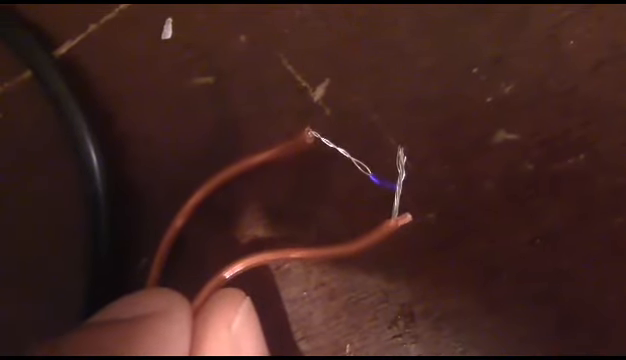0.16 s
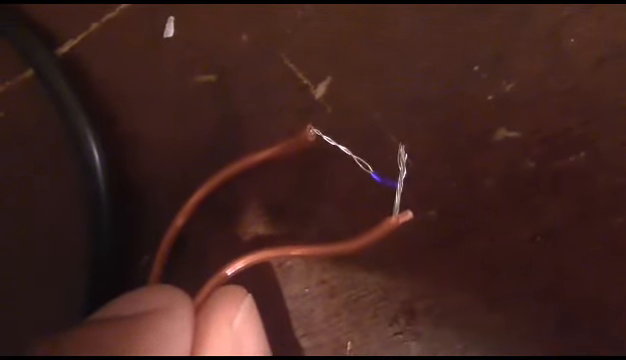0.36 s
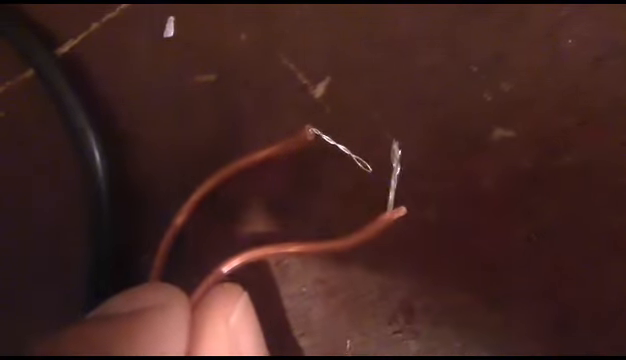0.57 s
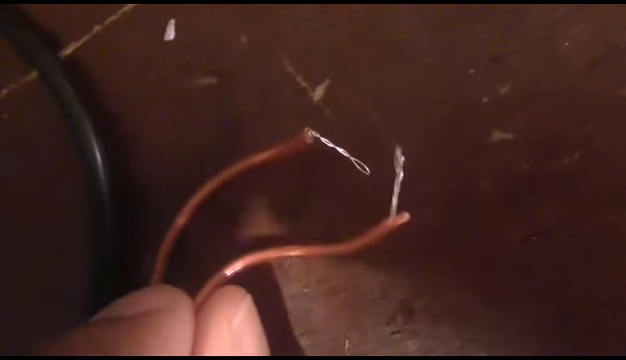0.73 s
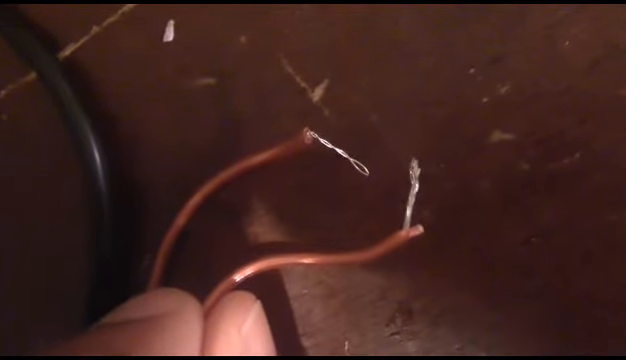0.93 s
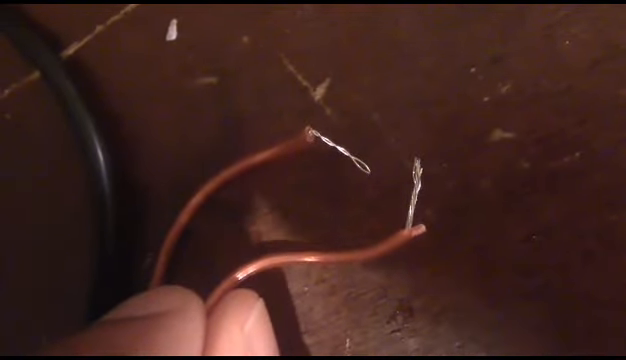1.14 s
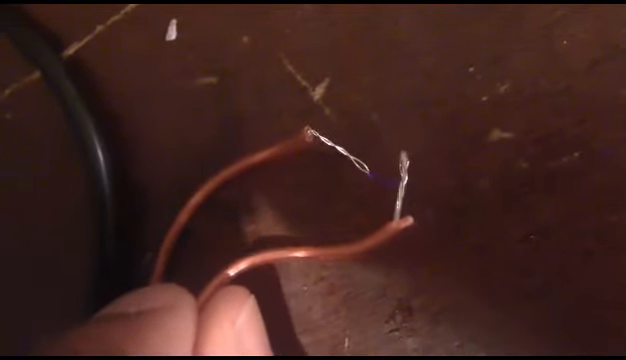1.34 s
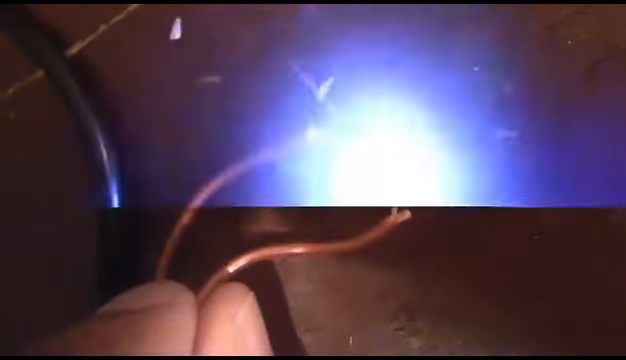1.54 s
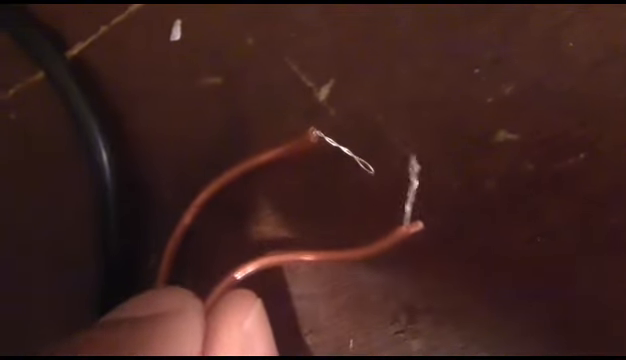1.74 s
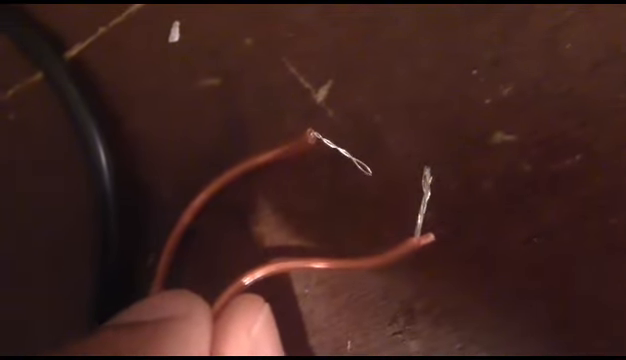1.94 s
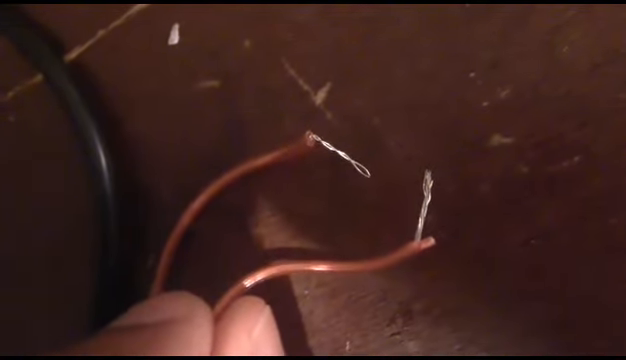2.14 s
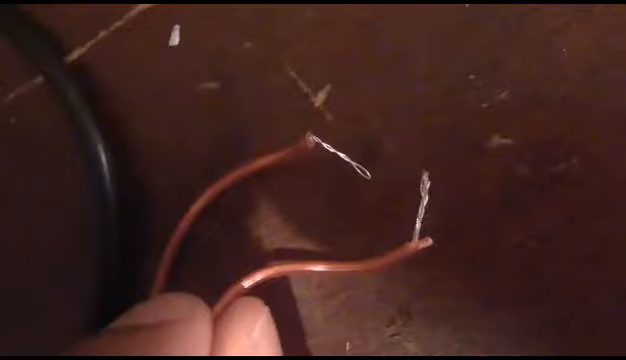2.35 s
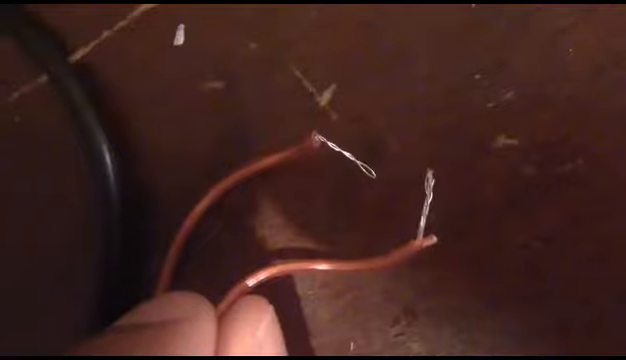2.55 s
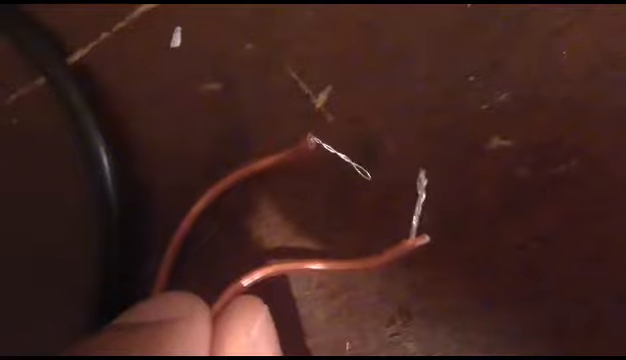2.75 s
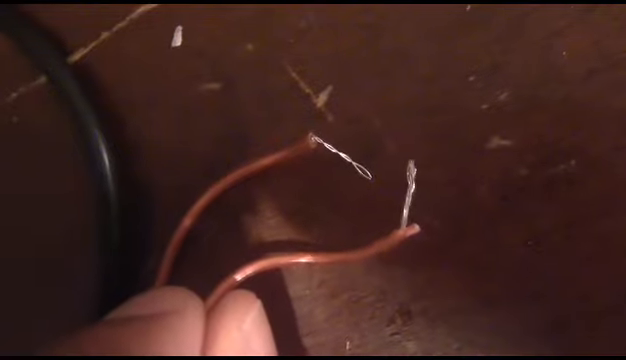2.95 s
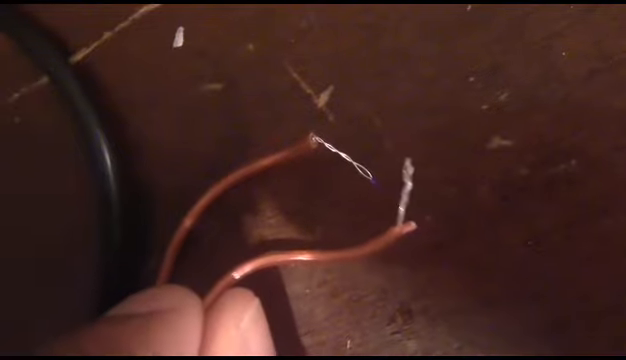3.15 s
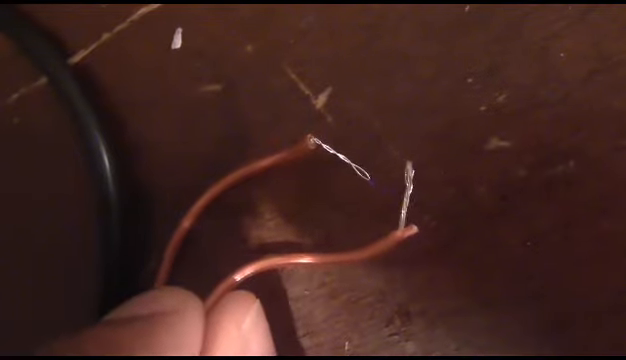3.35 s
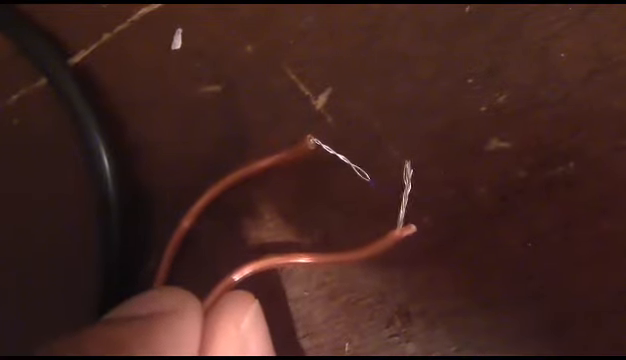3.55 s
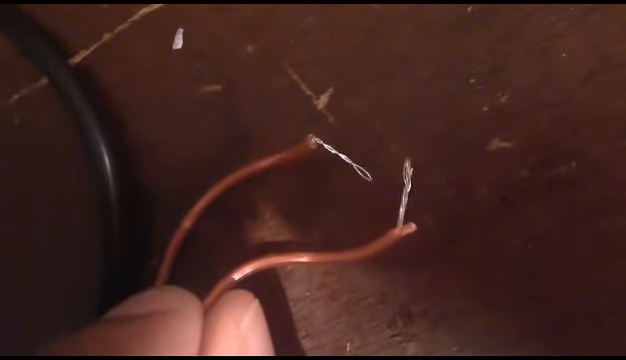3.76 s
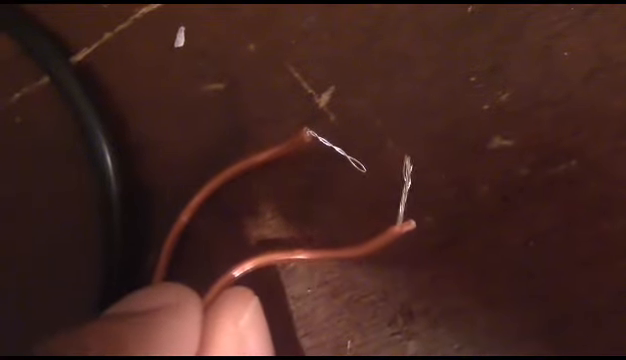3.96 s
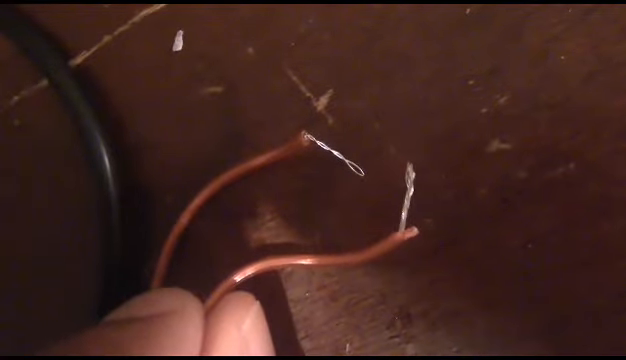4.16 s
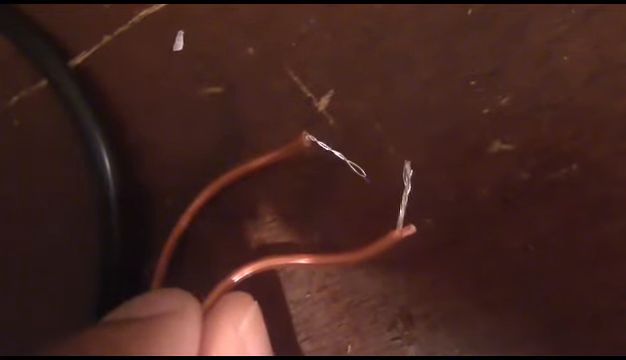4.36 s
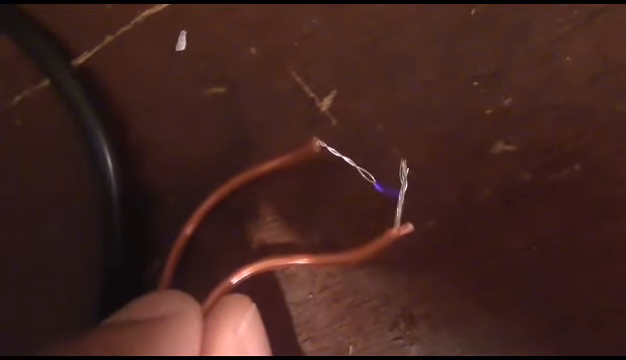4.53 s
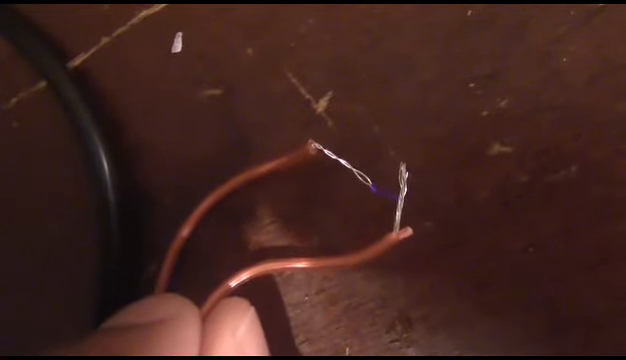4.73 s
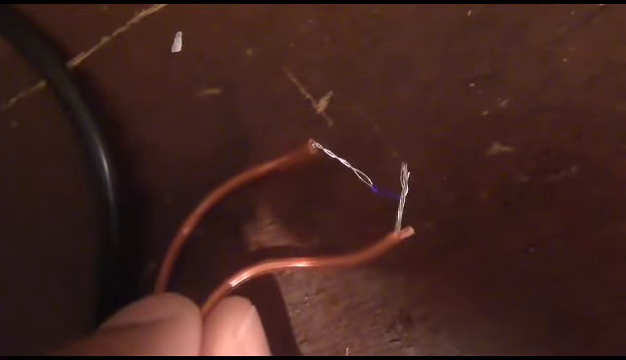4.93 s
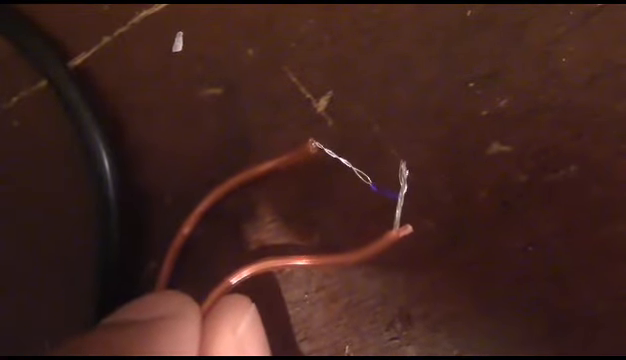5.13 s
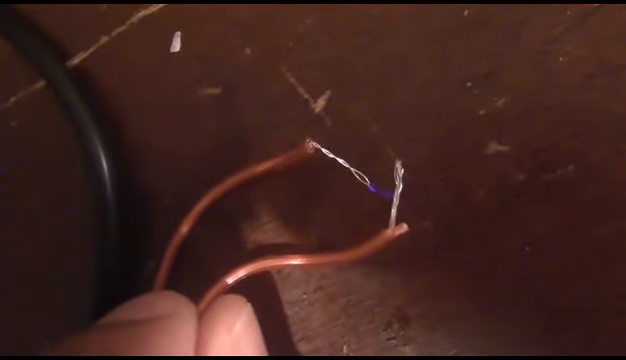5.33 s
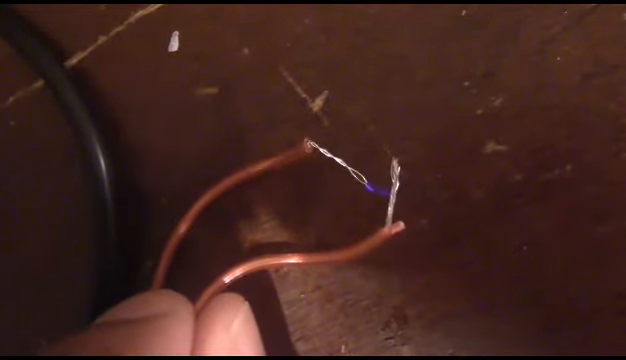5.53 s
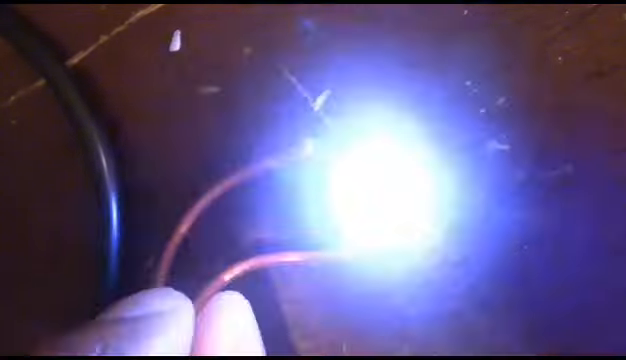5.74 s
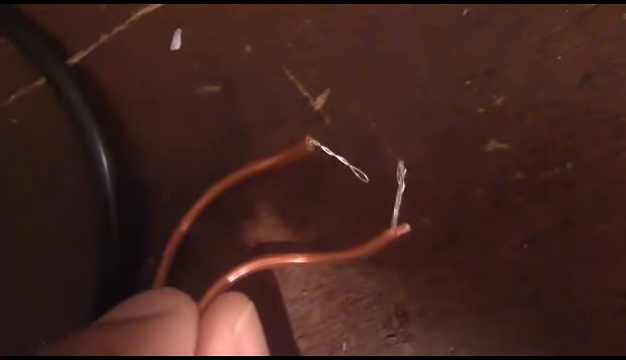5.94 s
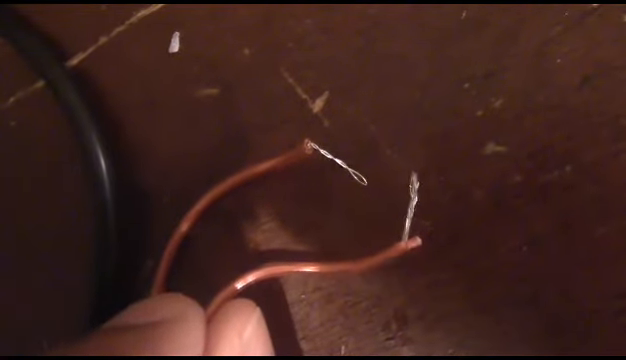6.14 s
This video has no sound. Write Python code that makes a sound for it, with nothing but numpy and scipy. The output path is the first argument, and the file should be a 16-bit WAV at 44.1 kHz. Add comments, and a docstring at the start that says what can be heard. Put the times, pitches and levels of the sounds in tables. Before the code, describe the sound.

A thin electric arc sizzles brightly between two wire ends, close to the microphone, with the very high whine of a small high-voltage generator. A light knock comes at 0.4 seconds. At 0.7 a loud spark snaps, overloading the microphone and ringing briefly in the room; the sizzle stops and the whine drops to a faint trace. The arc spits, sizzles again from 1.5, and ends in a second snap at 1.7. Faint ticking sputter starts around 2.2 and grows into short, uneven spurts between 3 and 4 seconds. Two soft rustles pass at about 2.4 and 4.4. From 4.6 the arc sizzles steadily and the whine slowly swells, until a third sharp snap cuts the arc off at 5.9. Faint hiss and low room noise continue throughout.

```python
"""A small high-voltage generator sparks between two wire ends held over a desk, whining near 10 kHz.
With the gap narrow a thin arc sizzles; with it wider the arc only spits in short spurts.
Three times a fat spark snaps, overloads the microphone and rings through the room.
Indoors, one close microphone: a light knock and two rustles nearby, faint murmur and hiss behind."""
import sys
import numpy as np
from scipy import signal
from scipy.fft import rfft, irfft
from scipy.io import wavfile

SR = 44100
rng = np.random.default_rng(int(sys.argv[2]) if len(sys.argv) > 2 else 0)


def master_out(mix):
    """Clip the mix to full scale and print it as 16-bit PCM to the path in sys.argv[1]."""
    frames = np.transpose(np.atleast_2d(mix))
    ceiling = np.clip(frames, -1, 1)
    pcm = np.round(ceiling * 32767).astype(np.int16)
    wavfile.write(sys.argv[1], SR, pcm)


N = 272979
TIME = np.arange(N) / SR


def from_db(db):
    """Decibels to gain."""
    return 10 ** (np.asarray(db) / 20)


def rms_one(x):
    """Scale to rms 1."""
    return x / np.sqrt(np.mean(x ** 2) + 1e-20)


def dying(t, t60):
    """Gain that falls 60 dB in t60 seconds."""
    return np.exp(-np.log(1000) * t / t60)


def in_time(rows):
    """Each column of a curve at every sample."""
    times, *columns = np.transpose(rows)
    return [np.interp(TIME, times, column) for column in columns]


def add(out, start_s, sound):
    """Mix a sound in at start_s."""
    at = max(round(start_s * SR), 0)
    out[at:at + len(sound)] += sound[:N - at]


def cut(x, hz, kind, order=2):
    """Butterworth filter."""
    return signal.sosfilt(signal.butter(order, hz, kind, fs=SR, output="sos"), x + 1e-18)


def colour(x, spectrum, size=4096):
    """Causal (minimum-phase) filter with the given spectral shape and unit energy."""
    hz, db = np.transpose(spectrum)
    grid = np.maximum(np.fft.rfftfreq(size, 1 / SR), 1)
    gain = from_db(np.interp(np.log(grid), np.log(hz), db))
    gain *= np.minimum(grid / hz[0], 1) * np.minimum(hz[-1] / grid, 1) ** 2   # roll off past both ends
    cepstrum = irfft(np.log(gain))[:size // 2]
    cepstrum[1:] *= 2
    pulse = irfft(np.exp(rfft(cepstrum, size)))
    return signal.oaconvolve(x, pulse / np.linalg.norm(pulse))[:len(x)]


def noise(spectrum, count=N):
    """Coloured noise of rms about 1."""
    return colour(rng.standard_normal(count), spectrum)


def drift(hz):
    """Random wander below hz, of rms 1."""
    return rms_one(cut(rng.standard_normal(N + SR), hz, "low")[SR:])


# the transformer's whine at the microphone: t/s, level/dB
WHINE_LEVELS = [(0, -47.5), (.7, -46), (.76, -64.5), (1.65, -67), (1.95, -72), (2.4, -67), (4.6, -66.5),
                (5.9, -55.5), (6.0, -65.5)]
def oscillator(arc_gain, idle_hz=9823, rise_hz=105, full_load_db=-44, recovery_s=.45,
               wander_hz=18, flutter_hz=45):
    """Phase in cycles and transformer whine; the pitch rises under the arc's load and sinks back slowly."""
    load = np.minimum(arc_gain / from_db(full_load_db), 1)
    fading = np.exp(-TIME / recovery_s)
    held_load = np.maximum.accumulate(load / fading) * fading
    hz = idle_hz + rise_hz * held_load + wander_hz * drift(25) + flutter_hz * drift(400)
    cycles = np.cumsum(hz) / SR
    whine = from_db(in_time(WHINE_LEVELS)[0]) * np.sqrt(2) * np.sin(2 * np.pi * cycles)
    return cycles, whine


def discharges(cycles, firing_share, clumping=.55, clump_hz=900):
    """At most one tiny spark a cycle; warm air helps the next, so they come in runs. Mean power 1."""
    at = np.flatnonzero(np.diff(np.floor(cycles)))
    ease = clumping * drift(clump_hz)[at] + .12 * drift(90)[at] + .5 * rng.standard_normal(len(at))
    rank = np.argsort(np.argsort(ease)) / len(at)
    fires = rank < firing_share[at]
    polarity = rng.choice([-1, 1], len(at))
    clicks = np.zeros(N)
    clicks[at] = fires * polarity * np.sqrt(N / len(at) / firing_share[at])
    return clicks


# spectrum of one tiny spark, close up: f/Hz, relative level/dB
SPARK_SPECTRUM = [(100, -35), (500, -16.5), (1800, -12), (2700, -8), (3950, -5), (5100, -9.5), (5950, -6),
                  (6500, -11), (7300, -6), (7900, -8.5), (9500, 2.5), (11800, 0.5), (14100, -6.5),
                  (15000, -19.5)]
def sizzle(clicks, treble_gain, body_gain, split_hz=7000):
    """Sparks heard as a bright edge and a duller body."""
    treble = cut(colour(clicks * treble_gain, SPARK_SPECTRUM), split_hz, "high", order=4)
    body = cut(colour(clicks * body_gain, SPARK_SPECTRUM), split_hz, "low", order=4)
    return treble + body


# the arc in the narrow gap, close up, one curve per burn: t/s, treble level/dB
ARC_BURNS = [
    [(0.0, -41), (0.028, -40), (0.654, -40), (0.7, -37)],
    [(1.495, -54), (1.531, -43), (1.601, -45), (1.623, -39), (1.695, -45), (1.735, -39)],
    [(4.637, -45), (4.643, -39.5), (4.799, -45), (5.287, -44.5), (5.365, -42), (5.663, -44), (5.671, -41.5),
     (5.91, -41)],
]
def arc_burns():
    """Gain of the steady arc: each burn lasts until a snap drains the charge."""
    gain = np.zeros(N)
    for burn, snap in zip(ARC_BURNS, FAT_SPARKS):
        burning = (TIME >= burn[0][0]) & (TIME < snap[0])
        gain += burning * from_db(in_time(burn)[0])
    return gain


FULL_ARC_DB = -37.5
def steady_arc(cycles, arc_gain, body_db=-.25, dulling=.83, weak_db=-46):
    """A louder arc fires on more of the cycles; a weak arc is duller."""
    body = arc_gain * np.maximum(from_db(weak_db) / (arc_gain + 1e-9), 1) ** dulling
    firing_share = np.clip((arc_gain / from_db(FULL_ARC_DB)) ** 2, .1, .7)
    return sizzle(discharges(cycles, firing_share), arc_gain, body * from_db(body_db))


# spectrum of the room's wash, heard from the desk: f/Hz, relative level/dB
WASH_SPECTRUM = [(150, -32), (500, -15.5), (1200, -4), (2200, -5.5), (3600, -1.5), (4600, -4.5),
                 (6000, 1.5), (7500, -0.5), (9400, 3), (10900, -4.5), (12000, 0), (15500, -10)]
def room_tail(t60=.27, build_s=.055, early_db=-4, dull_hz=7000, treble_t60=.079,
              late_db=-17, late_t60=.47):
    """Diffuse reflections build up while they cross the room, then die, the treble sooner."""
    t = TIME[:SR // 2]
    wash = noise(WASH_SPECTRUM, len(t))
    low = cut(wash, dull_hz, "low", order=1)
    swell = np.clip(t / .0053, 0, 1) ** 2 * from_db(early_db * np.maximum(1 - t / build_s, 0))
    decay_s = np.maximum(t - build_s, 0)
    lingering = wash * from_db(late_db) * dying(decay_s, late_t60)
    return swell * (low * dying(decay_s, t60) + (wash - low) * dying(decay_s, treble_t60) + lingering)


# murmur and hiss behind the generator: t/s, relative level/dB
MURMUR_LEVELS = [(0, -62.5), (.65, -59.5), (1.3, -62.5), (1.5, -70.5), (2.03, -79.5), (2.35, -73.5),
                 (5.2, -68), (6.1, -65.5)]
HISS_LEVELS = [(1.25, -69), (2.08, -76), (2.3, -70.5), (4.2, -68)]
# their spectra: f/Hz, relative level/dB
MURMUR_SPECTRUM = [(25, -27.5), (70, -17), (140, -12), (300, -1.5), (450, -4.5), (800, -8), (1500, -11.5),
                   (3000, -30)]
HISS_SPECTRUM = [(400, -14), (1200, -2), (2500, 0), (4500, -1), (5800, -3), (6600, -4.5), (8400, -3),
                 (9700, -3), (10800, -9), (13000, -13), (15500, -20)]
def room_tone(murmur_trim_db=.5):
    """Low room murmur and faint hiss, both slowly sinking and swelling."""
    murmur = from_db(in_time(MURMUR_LEVELS)[0] + murmur_trim_db) * noise(MURMUR_SPECTRUM)
    hiss = from_db(in_time(HISS_LEVELS)[0]) * noise(HISS_SPECTRUM)
    return murmur + hiss


# modes of a knock near the microphone: f/Hz, relative level/dB, t60/s
KNOCK_MODES = [(423, -28.5, 0.025), (1330, -23, 0.0123), (1610, -19, .011), (2135, -32, 0.0071),
               (3360, -31, .005)]
def knock(start_s=.4129, contact_s=.00016, low_cut_hz=300):
    """One light contact sets a few short-lived modes ringing."""
    out, t = np.zeros(N), TIME[:SR // 10]
    ring = sum(from_db(db) * dying(t, t60) * np.sin(2 * np.pi * hz * t) for hz, db, t60 in KNOCK_MODES)
    attack = 1 - np.exp(-t / contact_s)
    add(out, start_s, cut(ring * attack, low_cut_hz, "high"))
    return out


# fat sparks at close range, levels ahead of the overload: t/s, crack length/s, crack level/dB,
# pulse level/dB, pulse length/s, microphone swing f/Hz, room level/dB
FAT_SPARKS = [(0.7163, 0.002, -12.5, 1.5, .002, 85.1, -27.5),
              (1.7474, 0.0026, -5.5, -9.5, 0.0018, 151, -32.5),
              (5.9284, 0.0008, -2.5, 3.5, 0.002, 105, -29)]
# spectrum of the crack: f/Hz, relative level/dB
CRACK_SPECTRUM = [(200, -21.5), (1000, -19.5), (1800, -8.5), (4000, -1), (6200, -2), (9000, 1.5),
                  (12500, -1.5), (15500, -15)]
# first reflections from the walls to the microphone: delay t/s, level/dB
WALL_ECHOES = [(.0070, -13.5), (.0081, -6), (0.013, -6), (0.0179, -12), (0.031, -13), (.0545, -8),
               (.061, -17)]
def snaps(fade_s=.0004, desk_db=-24, desk_s=.004, dip_s=.001, dip_db=-11, leak_hz=40,
          scatter_db=-16, scatter_s=.0007):
    """A crack, a slow pressure pulse that makes the microphone swing, wall echoes and the room's wash."""
    out, t = np.zeros(N), TIME[:SR // 20]
    for start_s, length_s, crack_db, pulse_db, pulse_s, swing_hz, room_db in FAT_SPARKS:
        # the crack dies at once, but scatters a little longer off the desk
        direct = np.exp(-np.maximum(t - length_s, 0) / fade_s)
        off_desk = from_db(desk_db) * np.exp(-t / desk_s)
        add(out, start_s, from_db(crack_db) * (direct + off_desk) * noise(CRACK_SPECTRUM, len(t)))
        # a short dip, then the push; the microphone cannot hold a pressure, so it swings back
        dip = from_db(dip_db) * np.sin(np.pi * np.minimum(t / dip_s, 1))
        push = np.sin(np.pi * np.clip((t - dip_s) / pulse_s, 0, 1))
        swing = cut(push - dip, swing_hz, "high")
        add(out, start_s, from_db(pulse_db) * cut(swing, leak_hz, "high", order=1))
        # each wall returns one sharp spike and a little scatter
        spike = t == 0
        for delay_s, echo_db in WALL_ECHOES:
            scatter = from_db(scatter_db) * rng.standard_normal(len(t)) * np.exp(-t / scatter_s)
            add(out, start_s + delay_s, from_db(echo_db) * colour(spike + scatter, CRACK_SPECTRUM))
        add(out, start_s, from_db(room_db) * room_tail())
    return out


def afterglow(fuller_db=7, fade_s=.39):
    """Gain on the body of the spurts: they sound fuller for a moment after a snap."""
    since = np.maximum(TIME[:, None] - [snap[0] for snap in FAT_SPARKS], 0)
    return from_db(fuller_db * np.max((since > 0) * np.exp(-since / fade_s), axis=1))


# sputter in the wide gap, close up, one curve per bout: t/s, spit rate/Hz, relative treble level/dB
SPUTTER_BOUTS = [
    [(.88, 114, -34), (.98, 40, -47), (1.08, 48.3, -45.5), (1.2, 49, -50), (1.26, 250, -51.5),
     (1.36, 230, -56), (1.5, 266, -50.5)],
    [(2.2, 35.6, -58.5), (2.6, 35.4, -54), (3.05, 31, -49.5), (3.33, 25, -46.5), (3.37, 140, -30),
     (3.51, 130, -38), (3.57, 30, -46.5), (3.63, 190, -41.5), (3.73, 48, -41), (3.92, 192, -38),
     (3.99, 78, -45.5), (4.04, 110, -52.5), (4.15, 55, -52.5), (4.63, 35, -48.5)],
]
def spits(typical_s=.0008, length_spread=.34, wait_spread=.4, spread_db=2, count=400):
    """Charge builds up and leaps the gap after an uneven wait; yields t/s, length/s, level/dB."""
    for bout in SPUTTER_BOUTS:
        rate_hz, db = in_time(bout)
        active = (TIME >= bout[0][0]) & (TIME < bout[-1][0])
        charge = np.cumsum(rate_hz * active) / SR
        wait_draw, length_draw, level_draw = rng.standard_normal((count, 3)).T
        waits = np.exp(wait_spread * wait_draw)
        lengths = typical_s * np.exp(length_spread * length_draw)
        leaps = np.searchsorted(charge, np.cumsum(waits / waits.mean()))
        for at, length_s, offset_db in zip(leaps, lengths, spread_db * level_draw):
            if at < N:
                yield TIME[at], length_s, db[at] + offset_db


# the strongest spurts in the wide gap, close up: t/s, length/s, relative treble level/dB
STRONG_SPURTS = [(0.9252, .002, -38), (0.943, .0012, -40), (0.9654, .003, -41.5), (1.011, .0023, -42.5),
                 (2.7143, .0067, -53), (2.8293, .0055, -52.5), (3.0977, 0.0027, -42), (3.13, .002, -45),
                 (3.1575, .002, -49.5), (3.182, .003, -45), (3.313, .0016, -45), (3.346, .007, -38.5),
                 (3.364, .014, -39.5), (3.397, .014, -41.5), (3.4393, .008, -39), (3.452, .017, -40),
                 (3.584, .0012, -48), (3.6077, .0017, -42), (3.66, .011, -45.5), (3.716, .0048, -42.5),
                 (3.8134, .0032, -39.5), (3.843, .06, -39), (3.998, .031, -37), (4.448, .0034, -51),
                 (4.5615, .002, -47)]
def spurts(cycles, charging_s=.011, treble_db=-2.7, body_db=-6.5, dulling=.52,
           strike_treble_db=7, strike_body_db=15):
    """Short dense runs of sparks, each opened by one hard strike; the weak ones are duller."""
    treble, body, strikes = np.zeros((3, N))
    # the sputter pauses while a strong spurt charges up and burns
    pauses = [(start_s - charging_s, start_s + length_s) for start_s, length_s, _ in STRONG_SPURTS]
    sputter = [spit for spit in spits() if not any(begin < spit[0] < end for begin, end in pauses)]
    for start_s, length_s, db in list(STRONG_SPURTS) + sputter:
        run = slice(round(start_s * SR), round((start_s + length_s) * SR))
        treble[run] = from_db(db + treble_db)
        body[run] = from_db(db + body_db + dulling * (FULL_ARC_DB - db))
        strikes[run.start] = 1
    body *= afterglow()
    clicks = discharges(cycles, firing_share=np.full(N, .6), clumping=.2)
    openings = sizzle(strikes, treble * from_db(strike_treble_db), body * from_db(strike_body_db))
    return openings + sizzle(clicks, treble, body)


# rustles near the microphone: centre t/s, half-width/s, level/dB
RUSTLE_SWELLS = [(2.362, 0.017, -63), (4.37, 0.025, -65.5)]
# their spectrum: f/Hz, relative level/dB
RUSTLE_SPECTRUM = [(1500, -19), (3300, -8), (5200, 3), (6300, -22.5), (9000, -34.5)]
def rustles():
    """Two soft rubs of handling, each a brief swell of bright noise."""
    swells = sum(from_db(db) * np.exp(-.5 * ((TIME - centre_s) / width_s) ** 2)
                 for centre_s, width_s, db in RUSTLE_SWELLS)
    return swells * noise(RUSTLE_SPECTRUM)


def scene(room_db=-26):
    """One microphone close to the wire ends, with a little of the room; both channels alike."""
    arc_gain = arc_burns()
    cycles, whine = oscillator(arc_gain)
    near = steady_arc(cycles, arc_gain) + knock() + spurts(cycles) + rustles()
    tail = room_tail()
    reverb = signal.oaconvolve(near, tail / np.linalg.norm(tail))[:N]
    mono = whine + near + from_db(room_db) * reverb + room_tone() + snaps()
    return np.stack([mono, mono])


def record(dry, clip_level=.46, cutoff_hz=15900):
    """The microphone input overloads on the snaps; a steep low-pass cuts the highest treble."""
    clipped = np.clip(dry, -clip_level, clip_level)
    return signal.sosfilt(signal.ellip(10, .2, 70, cutoff_hz, fs=SR, output="sos"), clipped)


dry = scene()
out = record(dry)
master_out(out)
```